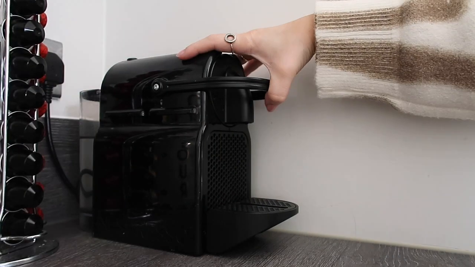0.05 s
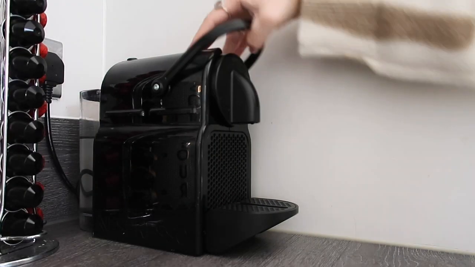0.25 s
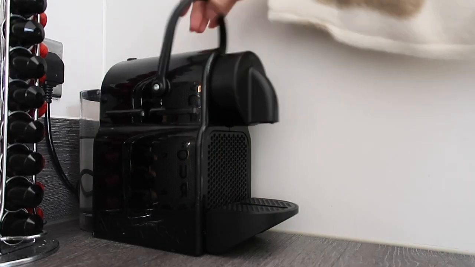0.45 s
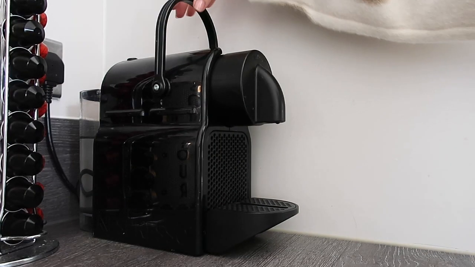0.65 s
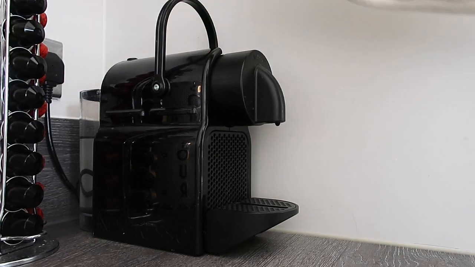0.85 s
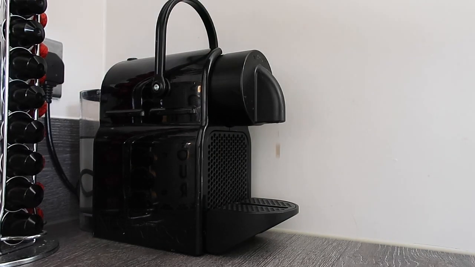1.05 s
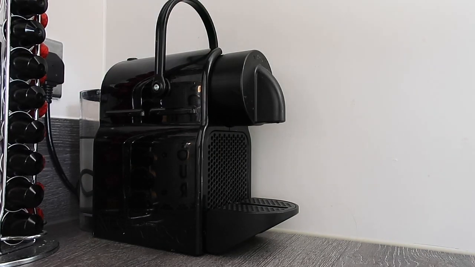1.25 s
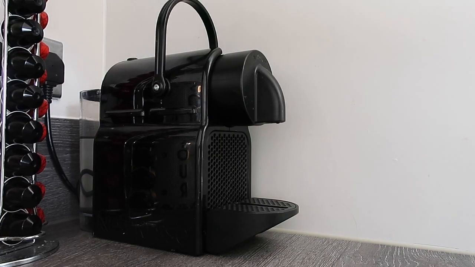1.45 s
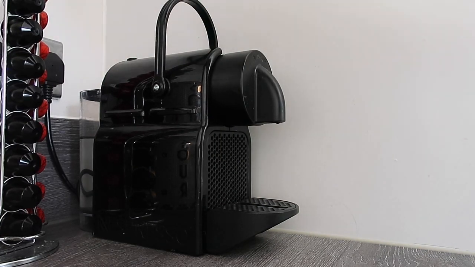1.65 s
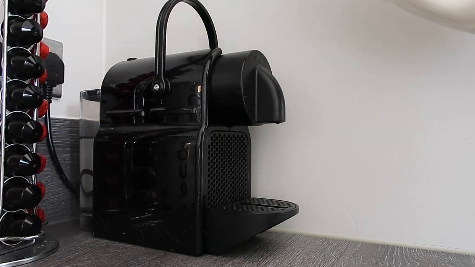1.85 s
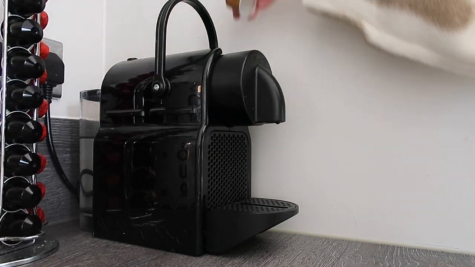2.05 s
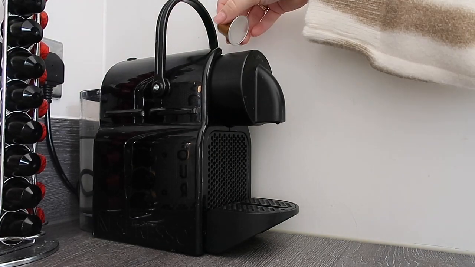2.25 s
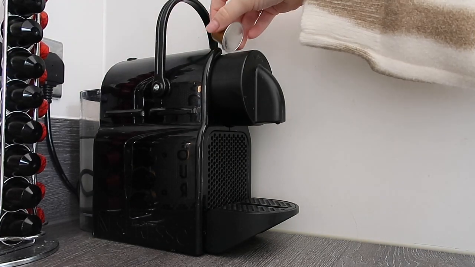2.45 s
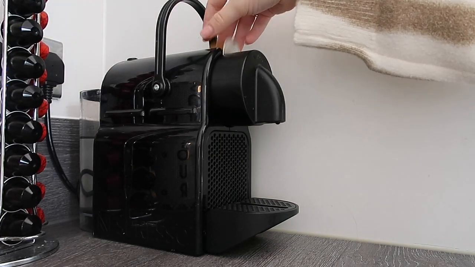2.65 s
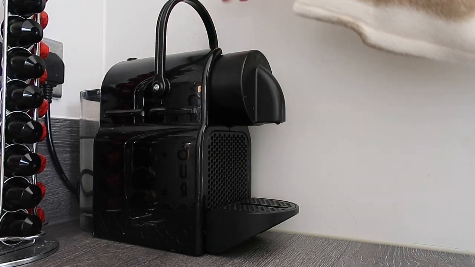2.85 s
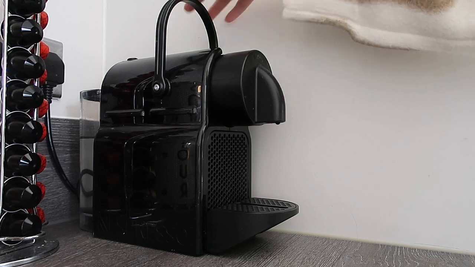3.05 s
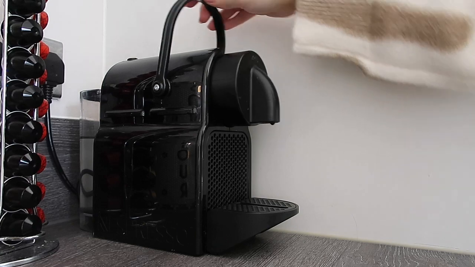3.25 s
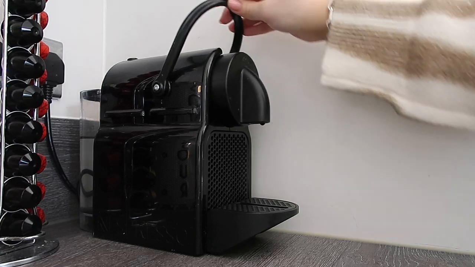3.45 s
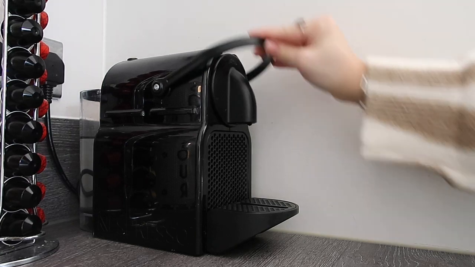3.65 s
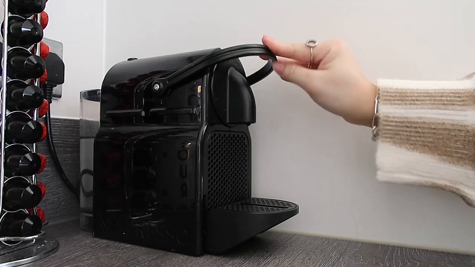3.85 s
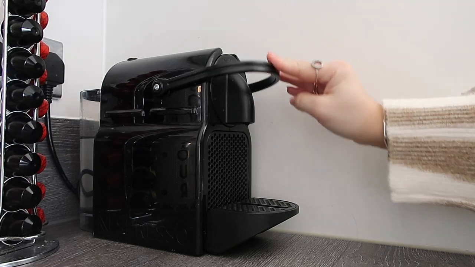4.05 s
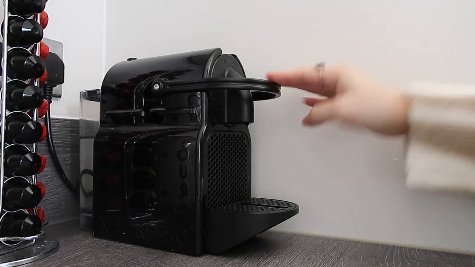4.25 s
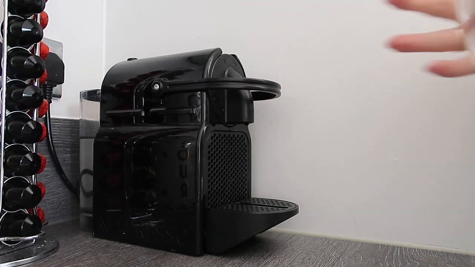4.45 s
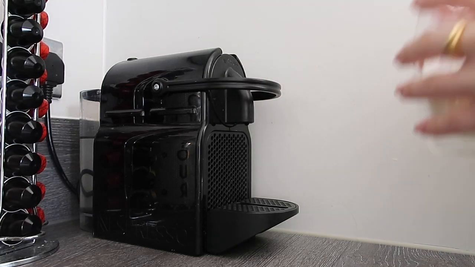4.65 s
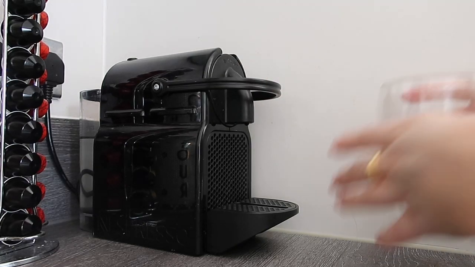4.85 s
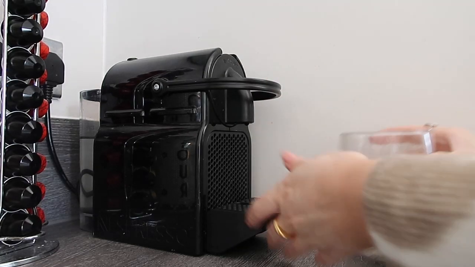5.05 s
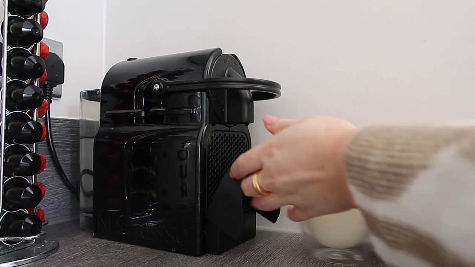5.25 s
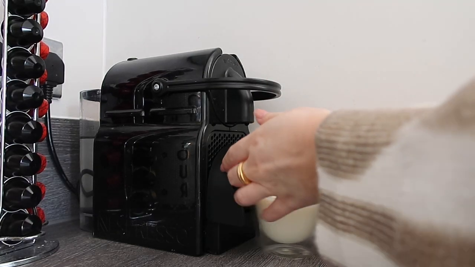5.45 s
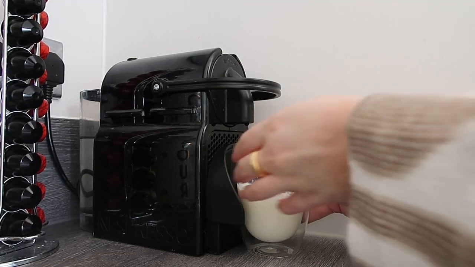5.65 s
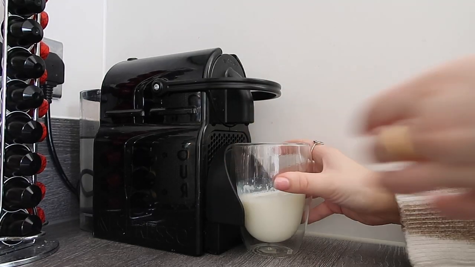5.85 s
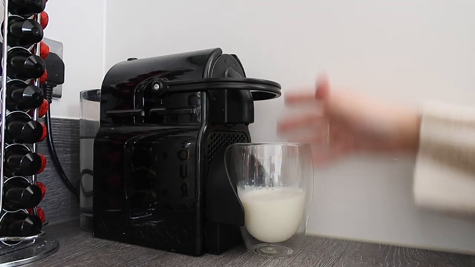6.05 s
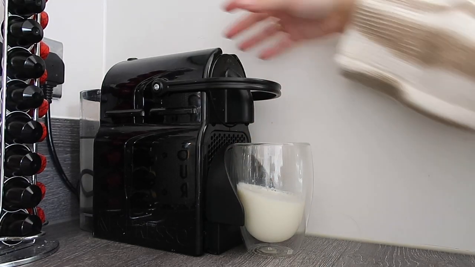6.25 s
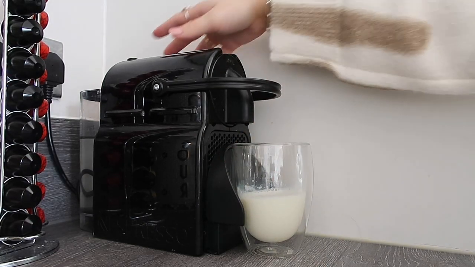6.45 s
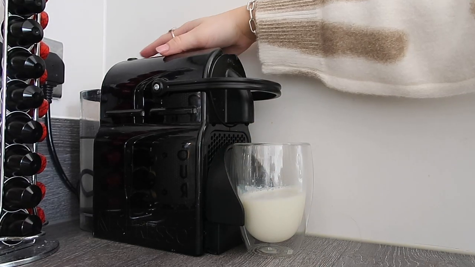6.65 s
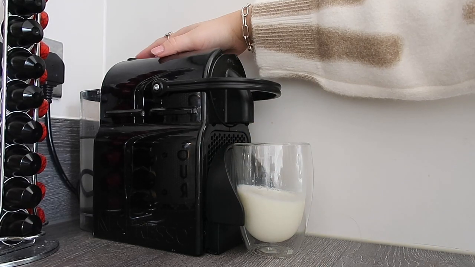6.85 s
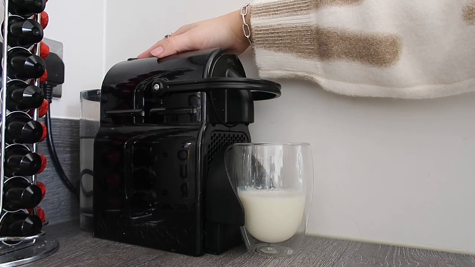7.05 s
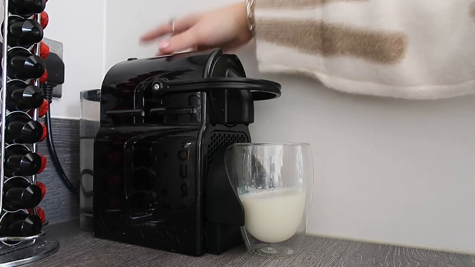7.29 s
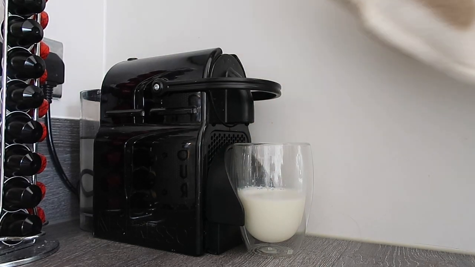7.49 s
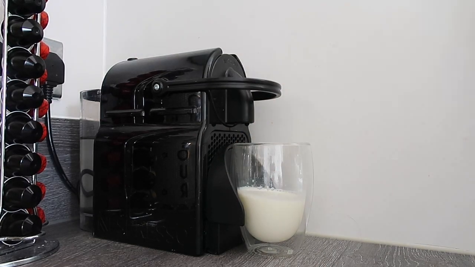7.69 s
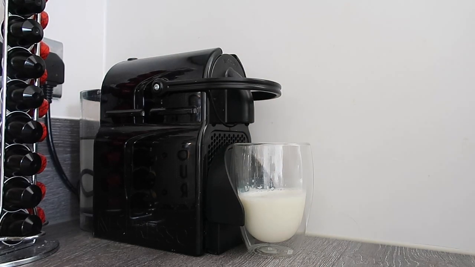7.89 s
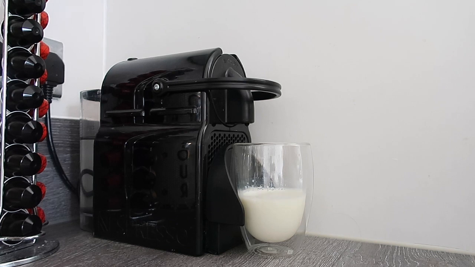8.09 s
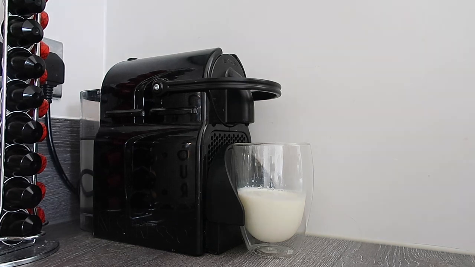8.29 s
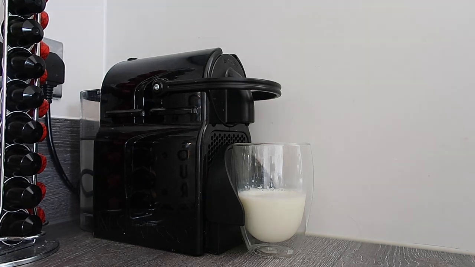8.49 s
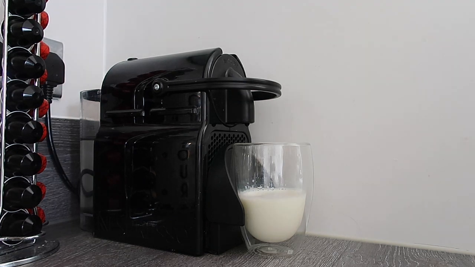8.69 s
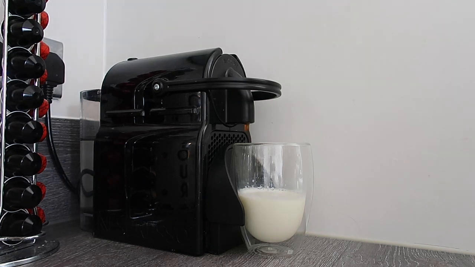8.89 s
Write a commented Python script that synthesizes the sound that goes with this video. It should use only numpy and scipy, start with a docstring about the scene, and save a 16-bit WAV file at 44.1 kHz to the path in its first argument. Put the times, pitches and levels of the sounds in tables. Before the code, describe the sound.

Close stereo in a small hard kitchen, soft low room tone with a faint distant whine. From 0.1 to 0.9 s a plastic lever knocks, snaps, slides and gives a short rising creak before hitting its stop; duller small knocks come near 1.1-1.2 s. Light foil ticks at 1.4-1.55 s, then a capsule knocks into its slot at 2.7-2.8 s. From 3.2 s soft taps and slow scraping lead to rough squeezing and a loud clamp snap with low thud at 4.2 s; the background dips, then recovers. The tray folds up rattling at 5.25-5.55 s, a glass drags and lands at 5.67 s, a bright clatter follows at 6.2 s. At 7.2 s the pump starts, stumbling dry; from 7.45 s it spits and its hollow resonance climbs; after 8.16 s it loads into a steady 50-per-second buzz, with a clink at 8.6 s, running to the end.

```python
"""A vibrating pump drives a capsule coffee machine: it stumbles on every second stroke while dry, spits as
the chamber fills, then settles into a buzz under pressure. Before it, the lever is raised, the spent capsule
drops, a new one goes in, the lever is clamped shut, the drip tray is folded up and a glass is set down.
Blows are ringing tones plus dense noise, slides are uneven filtered noise, and the pump repeats bursts,
overtones, taps and hum at its stroke rate. A small hard kitchen and a soft room tone lie behind."""
import sys
import numpy as np
from scipy import signal
from scipy.fft import rfft, irfft
from scipy.io import wavfile
from scipy.ndimage import uniform_filter1d

SR = 44100
rng = np.random.default_rng(int(sys.argv[2]) if len(sys.argv) > 2 else 0)


def put_to_file(sound):
    """Save the sound as 16-bit audio at rate SR, in the file named by the first command-line argument."""
    columns = np.atleast_2d(sound).T  # one column per channel
    safe = np.clip(columns, -1, 1)
    whole_steps = np.round(safe * 32767)
    wavfile.write(sys.argv[1], SR, whole_steps.astype(np.int16))


N = 393813
TIME = np.arange(N) / SR
LATCH_S = 4.2115  # the clamp snaps home
PUMP_ON_S, STROKE_HZ = 7.2045, 50.09
CATCH_S = 7.445  # water reaches the piston


def from_db(db):
    """Turn decibels into a gain."""
    return 10 ** (np.asarray(db) / 20)


def rms_one(x):
    """Scale to unit power."""
    return x / np.sqrt(np.mean(x ** 2) + 1e-20)


def band(x, low_hz, high_hz, order=3):
    """Keep only the pitches between two limits."""
    limits_hz = [low_hz, min(high_hz, .45 * SR)]
    return signal.sosfilt(signal.butter(order, limits_hz, "band", fs=SR, output="sos"), x)


def colour(x, spectrum, size=4096):
    """Shape a sound to follow (pitch_hz, level_db) points, with the least possible delay."""
    hz, db = np.transpose(spectrum)
    grid_hz = np.maximum(np.arange(size // 2 + 1) * SR / size, 1)
    gain = from_db(np.interp(np.log(grid_hz), np.log(hz), db))
    # folding the cepstrum makes the filter minimum-phase
    cepstrum = irfft(np.log(gain))
    cepstrum[1:size // 2] *= 2
    cepstrum[size // 2 + 1:] = 0
    response = irfft(np.exp(rfft(cepstrum)))
    return signal.oaconvolve(x, response)[:len(x)]


def drift(rate):
    """Smoothly joined random values around 0, with a new value `rate` times a second."""
    return np.interp(TIME * rate, np.arange(12000), rng.standard_normal(12000))


def fade(t, t60):
    """Die away by 60 dB in t60 seconds."""
    return np.exp(-np.log(1000) * t / t60)


def ramp(start_s, length_s):
    """Rise evenly from 0 to 1."""
    return np.clip((TIME - start_s) / length_s, 0, 1)


def add(out, s, sound):
    """Mix a sound in at time s."""
    start = max(round(s * SR), 0)
    out[start:start + len(sound)] += sound[:N - start]


def resonate(x, hz, width_hz):
    """Ring at a pitch that may move; unit power."""
    turn = np.exp(2j * np.pi * np.cumsum(hz) / SR)
    # shift the pitch down to zero, keep what is near it, and shift back up
    lowpass = signal.butter(2, width_hz / 2, fs=SR, output="sos")
    return rms_one((signal.sosfilt(lowpass, x / turn) * turn).real)


def struck(modes, s):
    """One blow at time s sets fading pure tones ringing."""
    out, t = np.zeros(N), TIME[:SR // 2]
    ring = sum(from_db(db) * np.sin(2 * np.pi * hz * t) * fade(t, t60) for hz, db, t60 in modes)
    add(out, s, ring * (1 - np.exp(-t / 0.00057)))
    return out


DIP_FALL_S, DIP_RECOVERY_S = 0.082, 0.51


def level_dip(depth_db):
    """The background sinks as the lever clamps shut, then slowly recovers."""
    recovery = np.exp(-np.abs(TIME - LATCH_S) / DIP_RECOVERY_S)
    return from_db(-depth_db * ramp(LATCH_S, DIP_FALL_S) * recovery)


ROOM_DB, DIP_DB = -53, 19.5
# tone of the soft rush: pitch_hz, level_db (per Hz)
ROOM_TONE = [(12, -22.5), (20, -12), (51, -0.5), (80, -14), (118, -4), (199, -18), (302, -12), (377, -18),
             (445, -15.5), (525, -22.5), (796, -23.5), (1310, -26), (3760, -33), (11100, -46), (15000, -61)]


def room_tone(whine_hz, whine_db, drone_hz, drone_db):
    """Noise makes a soft rush; narrow bands of it make the wavering whine and drone of a far appliance."""
    rush = rms_one(colour(rng.standard_normal(N), ROOM_TONE))
    whine = rms_one(band(rng.standard_normal(N), whine_hz - 5, whine_hz + 5, order=2))
    drone = rms_one(band(rng.standard_normal(N), drone_hz - 8, drone_hz + 8, order=2))
    blend = rush + from_db(whine_db) * whine + from_db(drone_db) * drone
    return from_db(ROOM_DB) * level_dip(DIP_DB) * blend


def kitchen(x, t60, treble_t60, wet_db, treble_db):
    """A small hard room answers with a blur of reflections, shorter in the treble."""
    t = TIME[:SR * 2 // 3]
    low = band(rng.standard_normal(len(t)), 74, 3100, order=2) * fade(t, t60)
    high = band(rng.standard_normal(len(t)), 3500, 17000, order=2) * fade(t, treble_t60)
    # the first reflections take a few milliseconds to arrive
    tail = (low + from_db(treble_db) * high) * np.clip(t / 0.011 - .3, 0, 1)
    return from_db(wet_db) * signal.oaconvolve(x, tail / np.sqrt(np.sum(tail ** 2)))[:N]


# how far left and right differ for nearby sounds (side against middle): pitch_hz, level_db
WIDTH = [(100, -53.5), (350, -25), (600, -65), (820, -15.5), (1040, -38.5), (1250, -19.5), (2200, -16.5),
         (2800, -15), (4500, -10), (6500, -2.5), (9000, 0.5), (14000, 2)]


def port_difference(x, spread_t60, split_hz):
    """Counter and wall reflections differ at left and right; in the treble the difference keeps changing."""
    t = TIME[:SR // 25]
    response = rfft(rng.standard_normal(len(t)) * fade(t, spread_t60), 2 * len(t))
    # even out the strength of all pitches, leaving only their random timing
    scatter = irfft(response / np.abs(response))[:len(t)]
    side = colour(signal.oaconvolve(x, scatter)[:N], WIDTH)
    treble = band(side, split_hz, 18000, order=2) * rms_one(np.tanh(3 * drift(150)))
    return band(side, 30, split_hz, order=2) + treble


# edges between the registers of a blow: pitch_hz
ZONES_HZ = [55, 200, 800, 2200, 5500, 15000]
PIVOT_HZ = 800  # a harder contact tilts the spectrum about this point


def blows(hits, modes, tone, registers_db, ring_db, rattle_t60, damping, rise_s):
    """Each blow rings a body's main tones and a dense noisy rattle, which dies sooner the higher it is."""
    out, t = np.zeros(N), TIME[:SR // 3]
    onset = slice(0, SR // 50)  # strength is set over the first 20 ms
    zones = list(zip(ZONES_HZ, ZONES_HZ[1:]))[-len(registers_db):]
    mass = rms_one(colour(rng.standard_normal(N) * from_db(2.3 * drift(500)), tone))
    for s, level_db, *brightness in hits:
        strengths = from_db(rng.normal(0, 1.4, len(modes))) * rng.choice([-1, 1], len(modes))
        ring = np.zeros(len(t))
        for strength, (hz, db, t60) in zip(strengths, modes):
            ring += strength * from_db(db) * np.sin(2 * np.pi * hz * t) * fade(t, min(t60, .2))
        ring = from_db(ring_db) * ring / np.std(ring[onset])
        # a harder contact favours the higher registers
        for (low, high), share_db in zip(zones, registers_db):
            centre = np.sqrt(low * high)
            db = level_db + share_db + sum(brightness) * np.log2(centre / PIVOT_HZ)
            dense = mass[int(s * SR):][:len(t)] * fade(t, rattle_t60 * (centre / 1000) ** -damping)
            body = (ring + dense / np.std(dense[onset])) * (1 - np.exp(-t / rise_s))
            part = band(body, low, high)
            add(out, s, from_db(db) * part / np.std(part[onset]))
    return out


def thuds(hits, hz, t60, second_hz, second_db):
    """Each knock makes the whole machine bounce on its feet: two low fading tones."""
    out, t = np.zeros(N), TIME[:SR // 3]
    tones = np.sin(2 * np.pi * hz * t) + from_db(second_db) * np.sin(2 * np.pi * second_hz * t)
    bounce = tones * fade(t, t60) * (1 - np.exp(-t / 0.0025))
    for s, thud_db in hits:
        add(out, s, from_db(thud_db) * bounce / np.std(bounce[:SR // 50]))
    return band(out, 88, 270, order=2)


# light ticks as a foil capsule is picked up: start_s, level_db (before the register shares)
TICKS = [(1.425, -67), (1.484, -53.5), (1.516, -44.5), (1.552, -39)]
# what the foil rings with: pitch_hz, level_db (relative), t60_s
FOIL = [(1400, -6, .015), (2700, -2, .012), (6000, -8, .01), (9800, -14, .015)]
# share of a blow in each register, up to the highest: level_db
FOIL_REGISTERS_DB = [-6.5, 2.5, -5.5]
# tone of the dense noisy rattle of glass, also used for the ticks: pitch_hz, level_db (per Hz)
GLASS_TONE = [(120, -0.5), (400, -8.5), (1500, 0.5), (2700, -14.5), (4500, -22), (8500, -30), (13000, -36),
              (15500, -39)]


def foil_ticks():
    """Thin foil gives short, light rings as it is picked up."""
    return blows(TICKS, FOIL, GLASS_TONE, FOIL_REGISTERS_DB,
                 ring_db=-9.0, rattle_t60=0.061, damping=0.14, rise_s=0.0018)


# a short bright clatter: start_s, level_db (before the register shares), brightness_db (per octave)
CLATTER_HITS = [(6.193, -30, -3), (6.202, -38, -2), (6.218, -44.5, 0.5), (6.236, -51, 0.5)]
# what it rings with: pitch_hz, level_db (relative), t60_s
CLATTER = [(1400, -1, .09), (1873, 2, .085), (2150, -2, .06), (2417, -1, .08), (2654, 3, .07),
           (2810, -2, .07), (3295, -6, .08), (3946, -2, .06), (4113, -8, .06), (4463, -12, .06)]
# tone of its dense noisy rattle: pitch_hz, level_db (per Hz)
CLATTER_TONE = [(300, -21), (750, -7), (1100, -4.5), (1500, -1), (2600, 2), (4200, -4), (5000, -20),
                (7000, -15.5), (13000, -30), (15500, -42)]
# share of a blow in each register, up to the highest: level_db
CLATTER_REGISTERS_DB = [-10.5, 5, 7.5, -7]


def bright_clatter():
    """Quick blows set close high tones ringing, with reflections of their own."""
    clatter = blows(CLATTER_HITS, CLATTER, CLATTER_TONE, CLATTER_REGISTERS_DB,
                    ring_db=2.5, rattle_t60=0.1, damping=0.04, rise_s=0.001)
    return clatter + kitchen(clatter, t60=0.55, treble_t60=0.35, wet_db=-15, treble_db=-6.0)


# the glass set down and nudged: start_s, level_db (before the register shares), brightness_db (per octave)
GLASS_HITS = [(5.671, -20.5, -2), (5.6755, -21, -0.5), (6.032, -45, -9.5)]
# what the glass rings with: pitch_hz, level_db (relative), t60_s
GLASS = [(368, 6.5, 0.074), (615, -4, 0.1), (840, -12, 0.05), (1380, 0, .03), (1570, 5, 0.04),
         (2630, 9, 0.022), (3050, 0, .02), (3670, -3.5, 0.03), (8070, -19, 0.03)]
# share of a blow in each register, up to the highest: level_db
GLASS_REGISTERS_DB = [-23, -3, -2.5, -1, -16]


def glass_blows():
    """The glass rings briefly as it is set down and nudged."""
    return blows(GLASS_HITS, GLASS, GLASS_TONE, GLASS_REGISTERS_DB,
                 ring_db=0.0, rattle_t60=0.059, damping=0.14, rise_s=0.00017)


GLASS_DRAG_S = 5.525
# how the glass sings as its base drags over the counter: pitch_hz, level_db, width_hz
GLASS_DRAG = [(2640, -56, 200), (6950, -70, 200)]


def glass_drag():
    """Fine slips keep the glass singing while it is pushed into place, until it lands."""
    moving = ramp(GLASS_DRAG_S, .01) * (1 - ramp(GLASS_HITS[0][0], .01))
    singing = sum(from_db(db) * resonate(rng.standard_normal(N), np.full(N, hz), width_hz)
                  for hz, db, width_hz in GLASS_DRAG)
    return moving * singing


# the drip tray folding up and bouncing: start_s, level_db (before the register shares),
# brightness_db (per octave)
TRAY_HITS = [(5.265, -19.5, 0.5), (5.361, -21.5, 1), (5.408, -32.5, -2), (5.43, -31.5, 0),
             (5.524, -29.5, -1), (5.548, -37.5, -3)]
# what the tray rings with: pitch_hz, level_db (relative), t60_s
TRAY = [(322, -0.5, 0.085), (382, 5.5, 0.034), (466, -6, 0.061), (576, -5, 0.058), (686, -5, 0.049),
        (1010, -7, 0.024), (1314, -19, .035), (2650, -24, 0.04), (3430, -15, 0.04), (4200, -14, 0.045),
        (4320, -24, .11), (6750, -35, .04), (8380, -34, 0.05)]
# tone of its dense noisy rattle: pitch_hz, level_db (per Hz)
TRAY_TONE = [(120, -8), (230, -29), (340, 5), (520, -20.5), (1050, -11.5), (1350, -27), (4300, -32),
             (6000, -47), (12500, -63), (15500, -97)]
# share of a blow in each register, up to the highest: level_db
TRAY_REGISTERS_DB = [-8.5, 3.5, -7.5, -23, -36.5]


def tray_blows():
    """The tray rings and rattles as it folds up and bounces."""
    return blows(TRAY_HITS, TRAY, TRAY_TONE, TRAY_REGISTERS_DB,
                 ring_db=6.5, rattle_t60=0.095, damping=0.15, rise_s=0.0005)


# what the tray's hinge sings with: pitch_hz, level_db (before a quick waver), t60_s
SPRING = [(345, -33, .25), (455, -31, .25)]


def tray_hinge():
    """The hinge sings on unevenly from the last but one bounce."""
    return struck(SPRING, TRAY_HITS[-2][0]) * from_db(2.8 * drift(99))


# the new capsule dropping into its slot: start_s, level_db (before the register shares),
# brightness_db (per octave)
CAPSULE_HITS = [(2.7228, -40, 1.5), (2.776, -39, 0.5), (2.7925, -26, 1), (2.809, -30, 1)]
# what the capsule rings with: pitch_hz, level_db (relative), t60_s
CAPSULE = [(571, -3, .06), (800, -5, .04), (1130, -6, .04), (1405, 0, .045), (2250, -3, .03),
           (3225, 1, .035), (4250, 2, .025), (6336, -19, .08)]
# tone of its dense noisy rattle: pitch_hz, level_db (per Hz)
CAPSULE_TONE = [(110, 3), (330, -1), (620, -5), (1400, 1), (1800, -11), (2300, -1.5), (4300, -4),
                (5500, -14), (8000, -21), (11500, -20.5), (15500, -37.5)]
# share of a blow in each register, up to the highest: level_db
CAPSULE_REGISTERS_DB = [-4.5, -2, -1, -3.5, -16]


def capsule_drop():
    """The new capsule rings as it knocks into its slot."""
    return blows(CAPSULE_HITS, CAPSULE, CAPSULE_TONE, CAPSULE_REGISTERS_DB,
                 ring_db=-2.0, rattle_t60=0.13, damping=0.32, rise_s=0.0011)


# lever, capsules, fingers and button knocking on the plastic housing:
# start_s, level_db (before the register shares), brightness_db (per octave), thud_db
KNOCKS = [(0.104, -37.5, -0.5, -36.5), (0.113, -47, 2.5, -53), (0.169, -46, 0, -49),
          (0.211, -22.5, -0.6, -31), (0.244, -26.5, 4, -22.5), (0.269, -25.5, -2.5, -25.5),
          (0.354, -43, -6.5, -51), (0.368, -30.5, 0, -25), (0.443, -38, -2.5, -32),
          (0.461, -43, 2.5, -30.5), (0.604, -34.5, -3, -34), (0.638, -22.5, -0.5, -32),
          (0.669, -41.5, 3.5, -36.5), (0.7113, -23.5, 1.5, -34), (0.7406, -28, 1.5, -33),
          (0.757, -26.5, 2, -40), (0.797, -24, 0.9, -31.5), (0.818, -36, 2.5, -36), (1.108, -50.5, -7, -44),
          (1.174, -43.5, -3, -56), (1.201, -47, -7, -49), (3.213, -34.5, 1, -37.5), (3.238, -43, 1.5, -35),
          (3.364, -53.5, -4, -57), (3.425, -43.5, 1, -49), (3.519, -61, -6, -34.5),
          (3.602, -44.5, -2, -39.5), (3.659, -58, -3, -53.5), (3.711, -39.5, -3, -37),
          (3.739, -40.5, -3.5, -37), (3.756, -38.5, -4.5, -30.5), (3.774, -41, -3, -16),
          (3.828, -58.5, -4.5, -34.5), (3.921, -48, -3.5, -58), (4.08, -54, -1, -51.5),
          (4.143, -49, -5.5, -43), (4.2103, -23.5, 1.5, -9.5), (4.26, -57, -5, -33), (5.182, -37.5, 1, -57),
          (6.615, -62, 3, -43), (7.074, -59, -8.5, -56), (7.199, -40.5, 5.5, -37)]
# what the housing rings with: pitch_hz, level_db (relative), t60_s
HOUSING = [(322, -6, .1), (450, -2, .09), (522, 0, .08), (665, -4, .06), (1098, -10, .035),
           (1518, -13, .03), (2444, -13, .02), (2842, -16, .02), (4247, -15, .012)]
# tone of its dense noisy rattle: pitch_hz, level_db (per Hz)
PLASTIC_TONE = [(100, -10), (250, -4.5), (420, 3.5), (640, -3.5), (900, -13.5), (1900, -20), (4300, -26.5),
                (7000, -34.5), (12500, -40.5), (15500, -46.5)]
# share of a blow in each register, up to the highest: level_db
HOUSING_REGISTERS_DB = [4, -3, -11.5, -25]


def housing_knocks():
    """Each knock makes the plastic housing ring and rattle."""
    return blows([row[:-1] for row in KNOCKS], HOUSING, PLASTIC_TONE, HOUSING_REGISTERS_DB,
                 ring_db=-3.0, rattle_t60=0.1, damping=0.18, rise_s=0.00026)


TRAY_THUD_DB, CAPSULE_THUD_DB = -10, -9.5  # how much of their blows reaches the machine's feet


def feet_thuds():
    """Knocks on housing, tray and capsule slot shake the machine on its feet."""
    jolts = [(row[0], row[-1]) for row in KNOCKS]
    jolts += [(s, db + TRAY_THUD_DB) for s, db, _ in TRAY_HITS]
    jolts += [(s, db + CAPSULE_THUD_DB) for s, db, _ in CAPSULE_HITS]
    return thuds(jolts, hz=116.2, t60=0.063, second_hz=90, second_db=-11.5)


SNAGS_PER_S, SNAG_DB, SNAG_T60_S = 60, 7, .025


def snags():
    """Friction jumps at each small snag and dies back; unit power."""
    catches = (rng.random(N) < SNAGS_PER_S / SR) * rng.uniform(.3, 1, N)
    dying = signal.lfilter([1], [1, -fade(1 / SR, SNAG_T60_S)], catches + 1e-18)
    return rms_one(1 + from_db(SNAG_DB) * dying)


# lever, capsule and tray sliding in their guides:
# start_s, end_s, body_db, hiss_db, swish_db, swell_db (change over the stroke)
SLIDES = [(0.267, 0.55, -38, -60, -57, 3), (0.552, 0.704, -33.5, -62, -58, 8),
          (0.814, 0.89, -54, -36, -60, -40), (1.164, 1.246, -45.5, -66, -63, -16),
          (3.337, 3.806, -45, -55.5, -61.5, 12), (3.787, 3.996, -68, -71, -74, 1.5),
          (3.975, 4.226, -45.5, -56.5, -69.5, 16), (5.44, 5.703, -40, -56.5, -63.5, 3),
          (3.554, 3.73, -63, -73, -63, 6), (5.278, 5.45, -39.5, -60, -67, 2)]
# tone of the slide's body, hiss and swish, each: pitch_hz, level_db
SLIDE_BODY = [(41, -53.5), (70, -20.5), (118, 2), (251, -10), (535, 0.5), (582, -12), (679, -6.5),
              (899, -28), (1170, -24), (2000, -30.5), (2600, -60.5), (4400, -120)]
SLIDE_HISS = [(590, -37), (1000, 8.5), (1880, -0.5), (2100, -2.5), (4440, -16.5), (12400, -43),
              (14000, -27.5)]
SLIDE_SWISH = [(1200, -21.5), (2600, -1), (3900, -0.5), (5200, -8), (7000, -11), (12500, -18.5),
               (15000, -33.5)]


def lever_slide(grain_db):
    """Plastic drags on plastic in small uneven slips, with a smoother swish."""
    slips = rng.standard_normal(N) * from_db(grain_db * drift(190))
    body = rms_one(colour(slips, SLIDE_BODY))
    hiss = rms_one(colour(slips, SLIDE_HISS))
    swish = rms_one(colour(rng.standard_normal(N) * from_db(3 * drift(400)), SLIDE_SWISH))
    catching, out = snags(), np.zeros(N)
    for start, end, body_db, hiss_db, swish_db, swell_db in SLIDES:
        moving = uniform_filter1d(1.0 * ((TIME > start) & (TIME < end)), size=1500)
        push = from_db(swell_db * (ramp(start, end - start) - .5))
        treble = from_db(hiss_db) * hiss + from_db(swish_db) * swish
        out += moving * push * (from_db(body_db) * body + catching * treble)
    return out


GROAN_S, GROAN_LENGTH_S, GROAN_FROM_HZ, GROAN_TO_HZ, GROAN_DB = 0.48, .105, 500, 690, -35


def lever_groan(width_hz):
    """The lever's pivot sticks and slips in a short, rough, rising creak on the way up."""
    travel = ramp(GROAN_S, GROAN_LENGTH_S)
    hz = GROAN_FROM_HZ + (GROAN_TO_HZ - GROAN_FROM_HZ) * travel
    slips = rng.standard_normal(N) * from_db(4 * drift(170))
    return from_db(GROAN_DB) * np.sin(np.pi * travel ** 2) * resonate(slips, hz, width_hz)


SQUEEZE_S, SQUEEZE_DB, SQUEEZE_DB_PER_S = .27, -44, 59


def capsule_squeeze():
    """Rough noise grows as the capsule is pressed ever harder on its seat, until the clamp snaps home."""
    growth = from_db(SQUEEZE_DB - SQUEEZE_DB_PER_S * np.abs(LATCH_S - TIME))
    effort = ramp(LATCH_S - SQUEEZE_S, .03) * (TIME < LATCH_S) * growth
    return effort * rms_one(band(rng.standard_normal(N) * from_db(3.9 * drift(150)), 720, 1450))


# what the clamp snapping home rings with: pitch_hz, level_db, t60_s
LATCH = [(233, -7.5, 0.048), (364, -27, 0.13), (687, -11, 0.036), (971, -15, 0.044), (1870, -15, 0.018),
         (2300, -14, 0.011), (2710, -16, 0.012), (3200, -19, .012)]
STOP_S = 0.712
# what the raised lever's end stop rings with: pitch_hz, level_db, t60_s
STOP = [(532, -2.5, 0.037), (1140, -19, 0.069), (2110, -29, 0.037), (2442, -22.5, .07)]
# the lever's sprung catch snapping past its notches: start_s, level_db
CATCH_SNAPS = [(0.2125, -41), (0.2446, -17.5), (0.7137, -24.5), (0.7415, -42), (0.757, -36), (3.705, -46),
               (3.7369, -54), (3.759, -46), (3.768, -46), (3.783, -52.5)]
# what the catch rings with: pitch_hz, level_db (relative), t60_s
CATCH = [(3780, 4, .014), (4200, -1, .03), (4900, -3.5, 0.015), (5650, 0.5, 0.012), (6300, -2.5, 0.02),
         (8100, -8.5, .018), (9250, -11, .012)]


def lever_snaps():
    """The clamp, the end stop and the sprung catch each ring when struck."""
    catch = sum(from_db(db) * struck(CATCH, s) for s, db in CATCH_SNAPS)
    return struck(LATCH, LATCH_S) + struck(STOP, STOP_S) + catch


CRACK_DB, CRACK_T60_S, CRACK_LOW_HZ, CRACK_HIGH_HZ = -13, 0.019, 1800, 6600


def crack():
    """The clamp's hard edge strikes with a few milliseconds of bright noise."""
    out, t = np.zeros(N), TIME[:SR // 10]
    noise = rms_one(band(rng.standard_normal(len(t)), CRACK_LOW_HZ, CRACK_HIGH_HZ, order=2))
    add(out, LATCH_S, from_db(CRACK_DB) * noise * fade(t, CRACK_T60_S) * (1 - np.exp(-t / 0.0018)))
    return out


def handling():
    """Hands work the machine: knocks on each body, thuds, snaps and drags."""
    bodies = housing_knocks() + tray_blows() + glass_blows() + capsule_drop()
    small = bright_clatter() + foil_ticks() + tray_hinge() + glass_drag()
    return band(bodies, 150, 18000, order=2) + feet_thuds() + small + capsule_squeeze() + lever_snaps()


CLINK_S = 8.622
# a small clink while the pump runs: pitch_hz, level_db, t60_s
CLINK = [(3300, -27, 0.052), (4130, -28, 0.048)]


def clink():
    """Two high tones ring briefly."""
    return struck(CLINK, CLINK_S)


def by_stage(levels_db, water, pressure):
    """Gain that moves from its dry to its flooded to its pressurised value."""
    dry_db, flooded_db, loaded_db = levels_db
    return from_db(dry_db + (flooded_db - dry_db) * water + (loaded_db - flooded_db) * pressure)


def bursts(cycles, alike, rise, decay, rest):
    """A noisy burst comes on every cycle; a share of it repeats from stroke to stroke."""
    phase = cycles % 1
    pattern = rng.standard_normal(SR)[(phase / (cycles[1] - cycles[0])).astype(int)]
    alike = np.clip(alike, 0, 1)
    swell = (1 - np.exp(-phase / rise)) * np.exp(-phase / decay) + rest
    return rms_one(swell * (np.sqrt(alike) * pattern + np.sqrt(1 - alike) * rng.standard_normal(N)))


# coil hum level: dry_db, flooded_db, loaded_db
HUM_DB = (-41.5, -42, -38)
# the overtone dies away during the dry strokes and returns with the load
OVERTONE_DRY_DB, OVERTONE_FADE_S, OVERTONE_IDLE_DB = -24, 0.25, -49
OVERTONE_LOADED_DB, OVERTONE_POWER = -31, 2.4


def coil_hum(cycles, water, pressure):
    """The coil hums at the stroke rate and at twice that."""
    dry = from_db(OVERTONE_DRY_DB) * (1 - ramp(PUMP_ON_S, OVERTONE_FADE_S))
    loaded = from_db(OVERTONE_LOADED_DB) * pressure ** OVERTONE_POWER
    overtone = dry + from_db(OVERTONE_IDLE_DB) + loaded
    hum = by_stage(HUM_DB, water, pressure) * np.sin(2 * np.pi * cycles)
    return np.sqrt(2) * (hum + overtone * np.sin(4 * np.pi * cycles))


SHUDDER_S = 0.163
# low tones of the shuddering casing: pitch_hz, level_db (before a slow waver)
SHUDDER = [(222, -29), (400, -28.5)]


def shudder():
    """The casing's low tones swell and fade as the piston first meets water."""
    swell = np.sin(np.pi * ramp(CATCH_S, SHUDDER_S))
    return swell * sum(from_db(db + 2 * drift(40)) * np.sin(2 * np.pi * hz * TIME) for hz, db in SHUDDER)


def buzz(orders, cycles, lag, scatter, waver_db):
    """The casing answers each stroke a little late; high overtones waver most in phase."""
    out, on = np.zeros(N), slice(int(PUMP_ON_S * SR), N)
    for k, db in orders:
        if k > 2:  # the first two are left out
            walks = rng.standard_normal((2, 250))
            swell, slip = (np.interp(TIME[on] * 25, np.arange(250), walk) for walk in walks)
            phase = 2 * np.pi * k * (cycles[on] - lag + 0.0026 * slip) + scatter * rng.normal()
            spread = np.pi * (k - 20) ** 2 / 200  # panels disperse the blow over a few milliseconds
            out[on] += from_db(db + waver_db * swell) * np.cos(phase + spread)
    return out / np.std(out[on])


# casing level: dry_db, flooded_db, loaded_db
CASING_DB = (-19, -22, -22.5)
# casing buzz while filling and under pressure, each: multiple (of the stroke rate), level_db (relative)
FILLING = [(1, -12), (2, -19), (3, -20), (4, -7.5), (5, -6), (6, -16.5), (7, -15), (8, -14), (9, -3.5),
           (10, -6.5), (11, -2.5), (12, -5.5), (13, -3.5), (14, -7), (15, -7.5), (16, -7), (17, -5),
           (18, -6.5), (19, -4.5), (20, -15), (21, -2.5), (22, -3), (23, -14), (24, -15), (25, -7),
           (26, -6), (27, -16), (28, -9), (29, -12), (30, -27), (31, -15), (32, -7.5), (33, -21), (34, -15),
           (35, -21), (36, -21), (37, -21), (38, -28), (39, -31)]
LOADED = [(1, -7), (2, 0), (3, -14), (4, -19), (5, -6.5), (6, -12), (7, -15), (8, -2.5), (9, -7), (10, -7),
          (11, -4.5), (12, -4), (13, -13), (14, -12), (15, -27), (16, -5.5), (17, -13), (18, -10.5),
          (19, -5.5), (20, -14), (21, -10), (22, -25), (23, -26.5), (24, -10), (25, -8.5), (26, -20),
          (27, -34), (28, -16), (29, -12), (30, -17), (31, -16), (32, -12.5), (33, -16), (34, -21),
          (35, -19), (36, -12), (37, -9), (38, -20), (39, -17)]
# tone of the rattle, running dry and wet, each: pitch_hz, level_db (per Hz)
DRY_RATTLE = [(65, -26.5), (110, -11), (156, -17.5), (221, -5), (293, -16), (389, -3.5), (612, -7),
              (669, -4), (714, -14.5), (866, -2.5), (1010, -16.5), (1250, -9), (1410, -7.5), (1690, -18.5),
              (2400, -24.5), (3120, -23), (5280, -120)]
WET_RATTLE = [(88, -15), (150, -15.5), (250, -10), (323, -14), (397, -3), (600, -4), (994, -8.5),
              (1220, -3.5), (1330, -7), (2060, -13), (2400, -16.5), (3120, -66), (5280, -120)]
DAMP_SHARE = 0.13  # share of water left in the pump at the start


def casing(cycles, stumble, water, pressure, load):
    """The piston shakes the casing: a rattle when dry, a buzz with loose parts when wet."""
    wetness = np.clip(water ** 1.23, DAMP_SHARE, 1)
    steady = bursts(cycles - .12, alike=0.31, rise=0.08, decay=0.36, rest=0.06)
    kicks = np.where(TIME < CATCH_S, stumble, steady)
    dry = from_db(-0.8) * rms_one(colour(kicks, DRY_RATTLE))
    filling = from_db(-2.0) * buzz(FILLING, cycles, lag=.36, scatter=1.12, waver_db=2.5)
    loaded = from_db(-3.0) * buzz(LOADED, cycles, lag=0.222, scatter=1.49, waver_db=3.0)
    rattling = bursts(cycles - .05, alike=0, rise=0.062, decay=0.36, rest=0.12)
    loose = from_db(-7) * rms_one(colour(rattling, WET_RATTLE))
    wet = np.sqrt(1 - load) * filling + np.sqrt(load) * loaded + loose
    return by_stage(CASING_DB, water, pressure) * (np.sqrt(1 - wetness) * dry + np.sqrt(wetness) * wet)


# the brewing chamber's two resonances climb as water displaces the air, hold for a while once it is full,
# and fade as pressure builds: start_s, lower_hz, lower_db, upper_hz, upper_db
CHAMBER = [(7.205, 320, -27, 1400, -48), (7.24, 580, -27, 1430, -42), (7.27, 847, -24.5, 1470, -30),
           (7.335, 846, -19, 1450, -32), (7.39, 870, -28, 1430, -31), (7.46, 850, -29, 1380, -27),
           (7.55, 833, -25, 1380, -32), (7.61, 1056, -26.5, 1560, -32), (7.72, 1090, -27.5, 1780, -37),
           (7.79, 1228, -25.5, 1810, -39), (7.98, 1230, -27, 1820, -33), (8.14, 1235, -27, 1820, -34),
           (8.3, 1230, -42, 1870, -61)]


def chamber(cycles, stumble, lag, froth, lower_width_hz, upper_width_hz):
    """Strokes kick the chamber's air: raggedly while dry, then with a clean pulse and a little froth."""
    s, *columns = np.transpose(CHAMBER)
    lower_hz, lower_db, upper_hz, upper_db = (np.interp(TIME, s, c) for c in columns)
    stroke_count = np.floor(cycles - lag)
    clean = rms_one(np.diff(stroke_count, prepend=stroke_count[0]))
    frothy = bursts(cycles - lag, alike=0, rise=.04, decay=.2, rest=.04)
    kicks = np.where(TIME < CATCH_S, stumble, rms_one(clean + froth * frothy))
    lower = from_db(lower_db) * resonate(kicks, lower_hz, lower_width_hz)
    return lower + from_db(upper_db) * resonate(kicks, upper_hz, upper_width_hz)


def valve_taps(modes, uneven_db, mode_db, jitter_s, detune, count=86):
    """The valve snaps on its seat once a stroke, never twice equally hard or at quite the same pitch."""
    t = TIME[:SR // 20]
    strokes = PUMP_ON_S + np.arange(count) / STROKE_HZ + jitter_s * rng.standard_normal(count)
    force_db, out = uneven_db * rng.standard_normal(count), np.zeros(N)
    for hz, db, t60, delay_s in modes:
        decay = fade(t, t60) * (1 - np.exp(-t / 0.0017))
        for s, tap_db, (harder, sharper) in zip(strokes, force_db, rng.standard_normal((count, 2))):
            ring = np.sin(2 * np.pi * hz * (1 + detune * sharper) * t) * decay
            add(out, s + delay_s, from_db(db + tap_db + mode_db * harder) * ring)
    return out


# level of the spit, and gain of the filling taps, each: dry_db, flooded_db, loaded_db
SPIT_DB = (-35.5, -29.5, -36)
TAP_DB = (-5.5, -0.5, -15)
# tone of the spit while filling and under pressure, each: pitch_hz, level_db (per Hz)
SPIT_FILLING = [(1180, -39), (1880, 6.5), (2030, -14), (2590, 7.5), (2980, -7), (3370, 3.5), (4050, 0.5),
                (4700, 0), (5150, -4.5), (7530, -12.5), (12500, -17.5), (14500, -36)]
SPIT_LOADED = [(1180, -31), (2000, 3), (2050, -7), (2590, 5), (2810, -2.5), (3630, -2.5), (4360, -1.5),
               (5190, -11.5), (5500, -9), (9900, -21.5), (12100, -21), (14500, -39)]
# what the outlet valve rings with while filling and under pressure, each:
# pitch_hz, level_db (before stage gain and random unevenness), t60_s, delay_s
VALVE = [(2380, -28.5, 0.031, 0.00214), (2606, -27, 0.049, 0.00258), (3370, -28, .025, 0.000985),
         (4000, -34, 0.022, .001), (4390, -23.5, 0.025, 0.00088), (4740, -20.5, 0.023, 0.000816),
         (5600, -32.5, 0.039, 0.00101)]
VALVE_LOADED = [(2510, -33, .03, .001), (3310, -35, .025, .0004), (4230, -27.5, .04, .0006),
                (4440, -27.5, .04, .0006), (4650, -30, .03, .0006)]


def valve(cycles, stumble, primed, water, pressure, load):
    """Each stroke spits through the ringing valve: sharply while air is left, more softly under pressure."""
    steady = bursts(cycles - .02, alike=.3, rise=.08, decay=.24, rest=.15)
    sharp = np.where(TIME < CATCH_S, stumble, steady)
    soft = bursts(cycles + .04, alike=0.33, rise=0.079, decay=0.84, rest=0.13) * from_db(2 * drift(50))
    filling = np.sqrt(1 - load) * rms_one(colour(sharp, SPIT_FILLING))
    loaded = np.sqrt(load) * rms_one(colour(soft, SPIT_LOADED))
    grain = rms_one(from_db(1.8 * drift(1200)))
    spit = by_stage(SPIT_DB, primed, pressure) * (filling + loaded) * grain
    filling_taps = valve_taps(VALVE, uneven_db=1.5, mode_db=2.2, jitter_s=0.0002, detune=.012)
    loaded_taps = valve_taps(VALVE_LOADED, uneven_db=1.8, mode_db=1.8, jitter_s=0.00012, detune=.004)
    taps = primed * by_stage(TAP_DB, water, pressure) * filling_taps + pressure ** 4 * loaded_taps
    return spit + taps


# water fills the chamber at a steady rate, then pressure builds against the coffee
PRIME_S, FILL_S, PRESSURE_FROM_S, PRESSURE_RISE_S = 0.024, 0.35, 8.16, 0.14
BACK_PRESSURE = 0.12  # lowest share of full pressure felt as load


def pump():
    """A mains-driven piston hums, shakes its casing, kicks the chamber's air and spits through the valve."""
    cycles = (TIME - PUMP_ON_S) * STROKE_HZ
    primed, water = ramp(CATCH_S - PRIME_S / 2, PRIME_S), ramp(CATCH_S, FILL_S)
    pressure = 1 - np.exp(-np.maximum(TIME - PRESSURE_FROM_S, 0) / PRESSURE_RISE_S)
    load = np.clip(pressure, BACK_PRESSURE, 1)
    jolt = thuds([(PUMP_ON_S, -23)], hz=123.7, t60=0.41, second_hz=223.0, second_db=-10.0)
    # running dry, the piston hits its stop only on every second stroke
    stumble = bursts((cycles - 1) / 2, alike=0.45, rise=0.05, decay=0.6, rest=.07)
    shaking = casing(cycles, stumble, water, pressure, load)
    air = chamber(cycles, stumble, lag=.2, froth=.3, lower_width_hz=100, upper_width_hz=125)
    spitting = valve(cycles, stumble, primed, water, pressure, load)
    together = coil_hum(cycles, water, pressure) + jolt + shudder() + shaking + air + spitting
    return ramp(PUMP_ON_S, 0.0076) * together


# how far left and right differ for the room tone, which comes from all around: pitch_hz, level_db
ROOM_WIDTH = [(50, -32.5), (110, -20), (200, -3), (380, -5), (700, 0.5), (3000, 1.5), (14000, 2.5)]


def scene():
    """The machine stands near the middle; reflections and room tone are wide."""
    tone_mid, tone_side = (room_tone(whine_hz=438.6, whine_db=-9.5, drone_hz=116.2, drone_db=-12.5)
                           for _ in range(2))
    hands = handling() + lever_slide(grain_db=4.5) + lever_groan(width_hz=160)
    echo_mid, echo_side = (level_dip(depth_db=3.5) * kitchen(hands, t60=0.41, treble_t60=0.25,
                                                             wet_db=-13.5, treble_db=3.5)
                           for _ in range(2))
    direct = hands + crack() + pump() + clink()
    mid = direct + echo_mid + tone_mid
    side = port_difference(direct, spread_t60=0.008, split_hz=3100)
    side = side + from_db(-14.5) * band(echo_side, 400, 15000, order=2)
    side = side + colour(tone_side, ROOM_WIDTH)
    # the first channel is slightly raised and the second lowered
    return np.array([mid + side, mid - side]) * from_db([[.2], [-.2]])


CUTOFF_HZ = 15800


def record(dry):
    """The top is cut steeply."""
    return signal.sosfilt(signal.ellip(10, .2, 80, CUTOFF_HZ, fs=SR, output="sos"), dry)


dry = scene()
out = record(dry)
put_to_file(out)
```